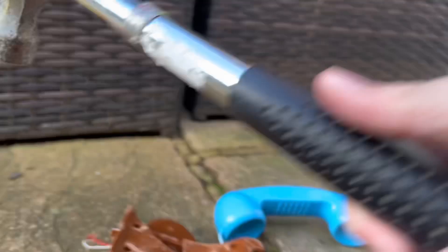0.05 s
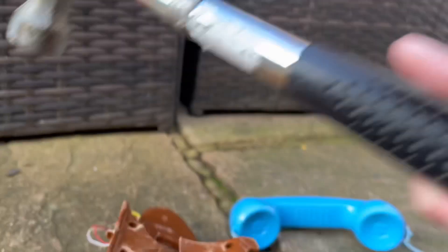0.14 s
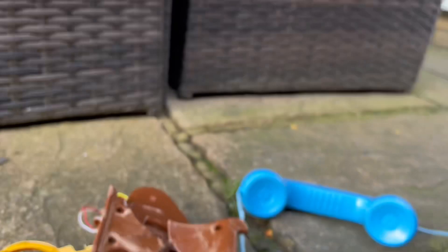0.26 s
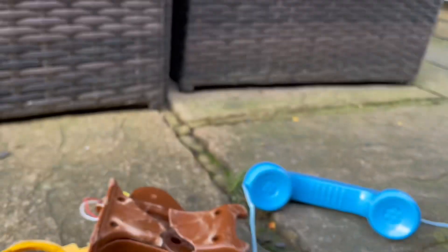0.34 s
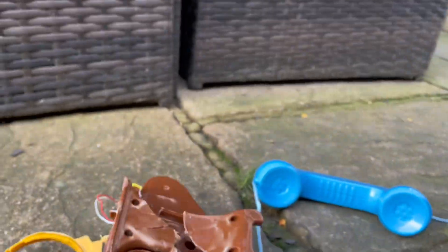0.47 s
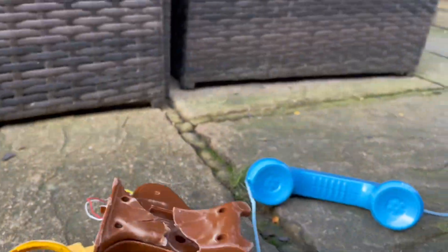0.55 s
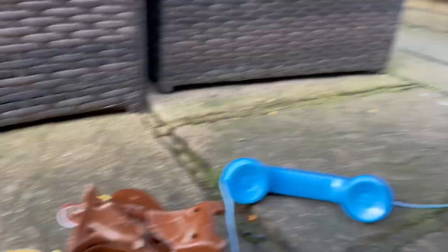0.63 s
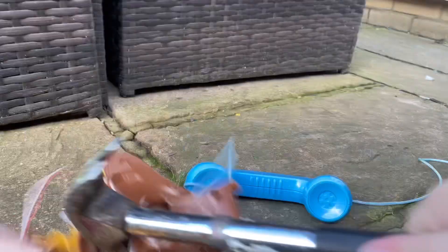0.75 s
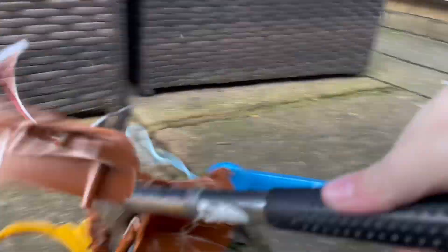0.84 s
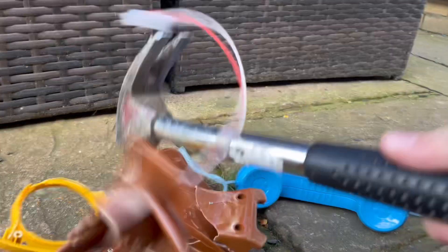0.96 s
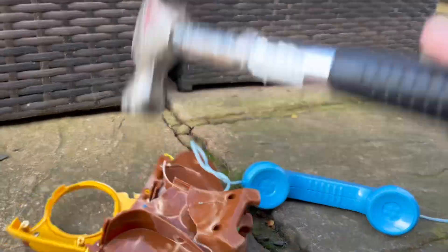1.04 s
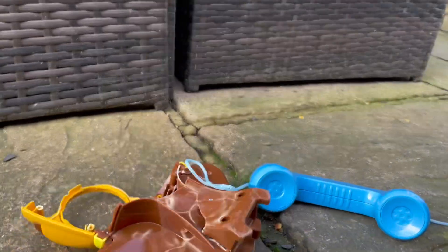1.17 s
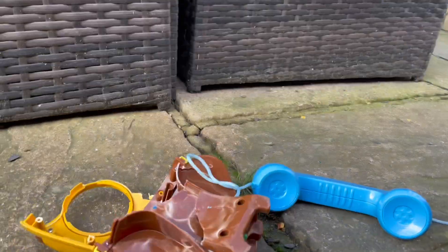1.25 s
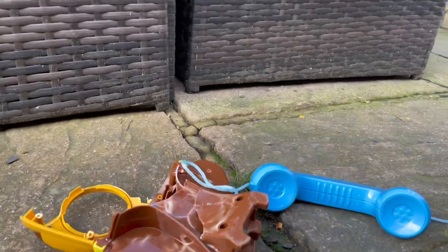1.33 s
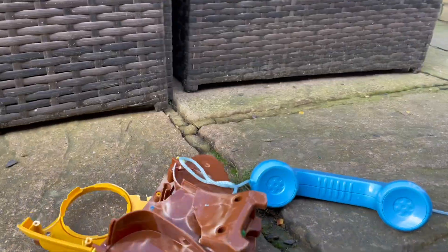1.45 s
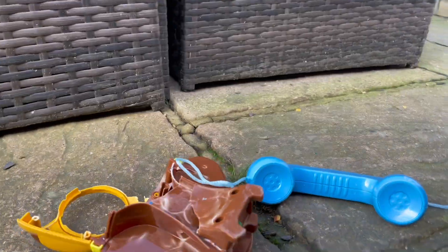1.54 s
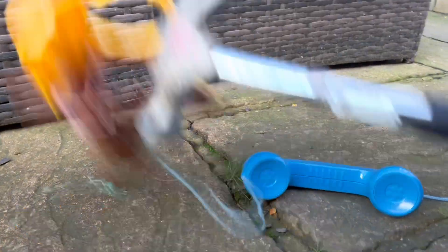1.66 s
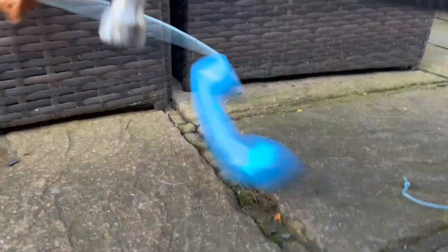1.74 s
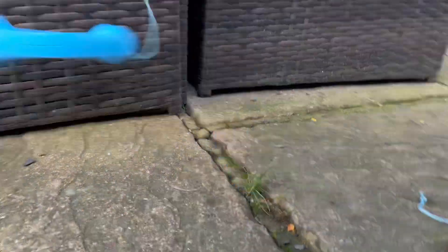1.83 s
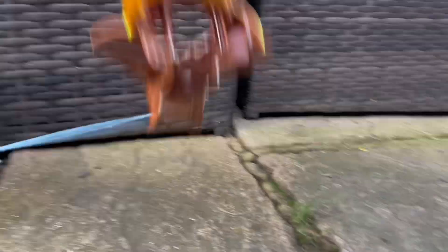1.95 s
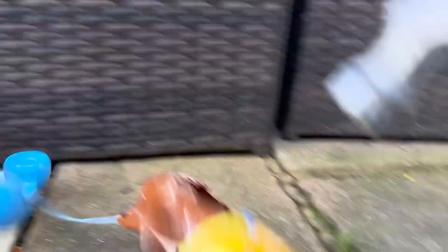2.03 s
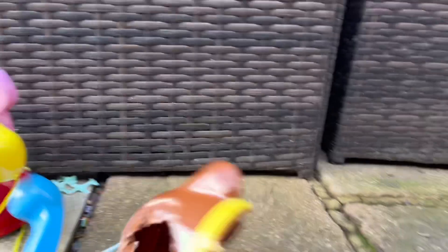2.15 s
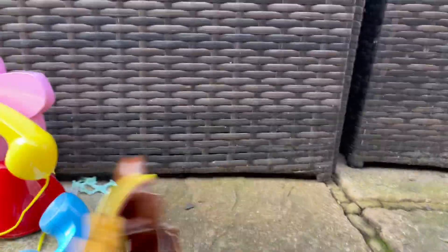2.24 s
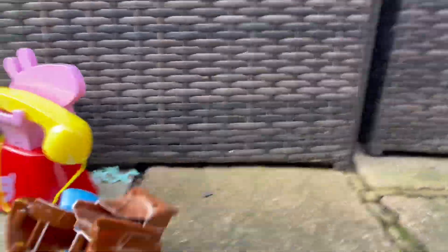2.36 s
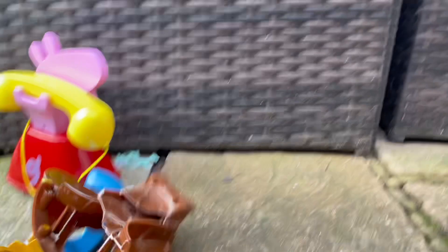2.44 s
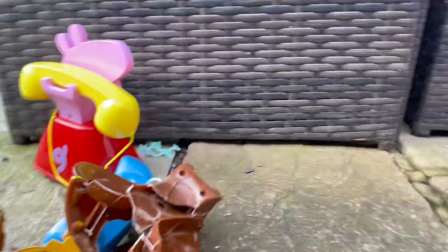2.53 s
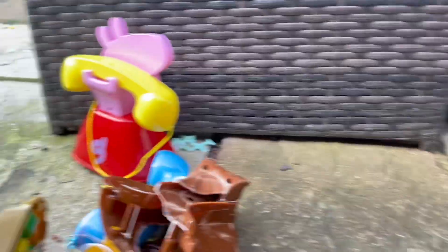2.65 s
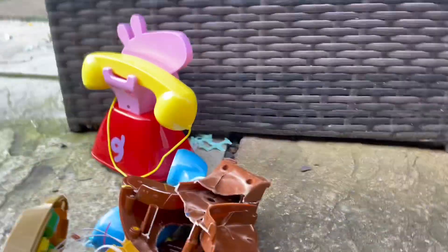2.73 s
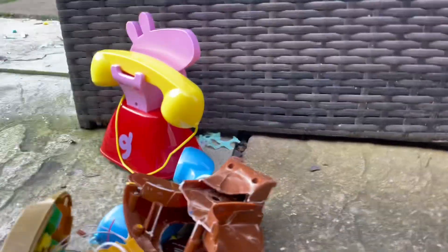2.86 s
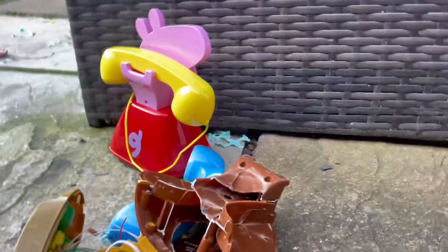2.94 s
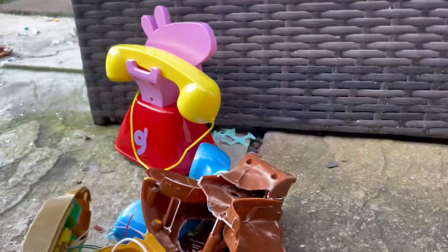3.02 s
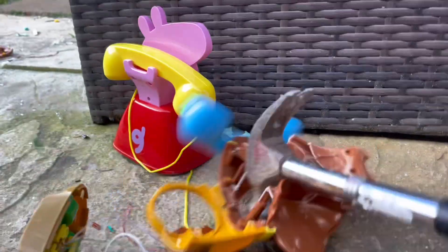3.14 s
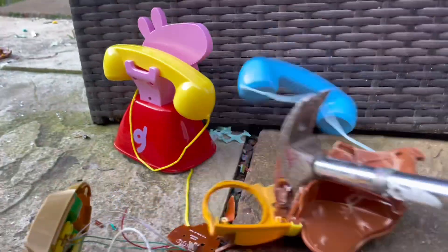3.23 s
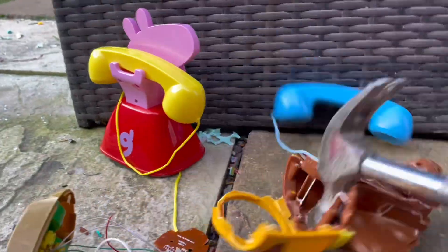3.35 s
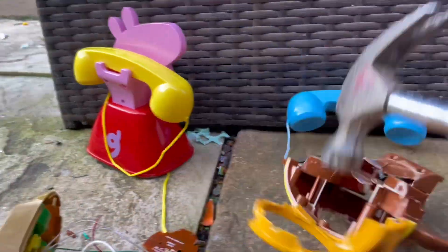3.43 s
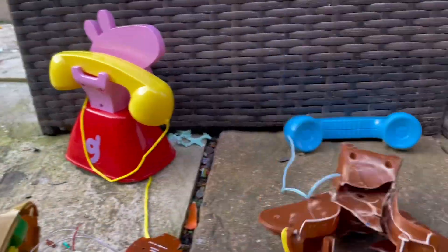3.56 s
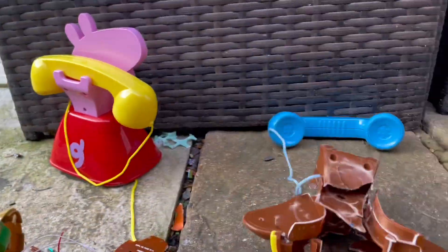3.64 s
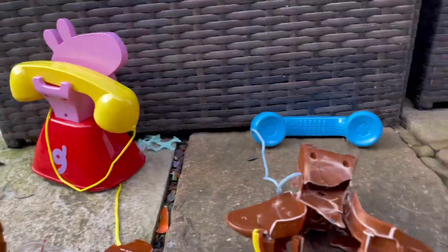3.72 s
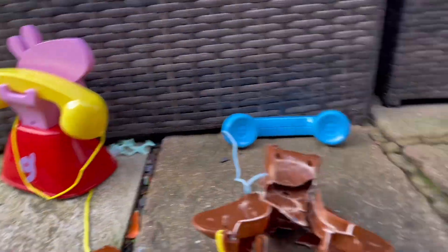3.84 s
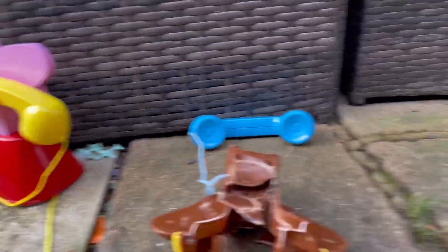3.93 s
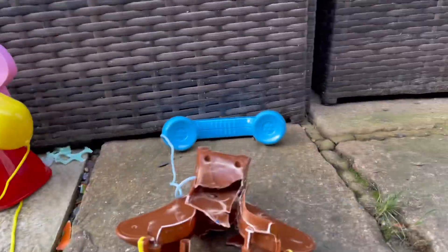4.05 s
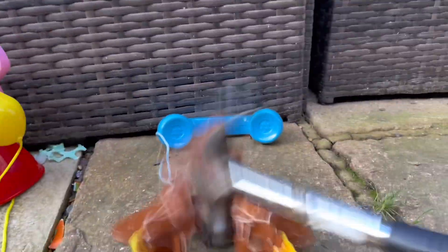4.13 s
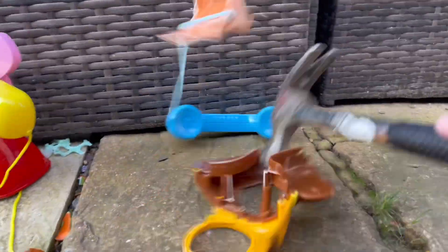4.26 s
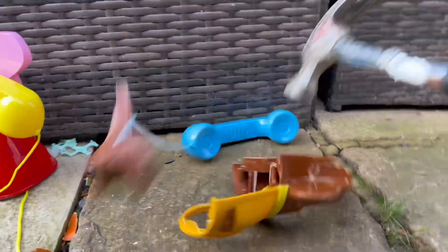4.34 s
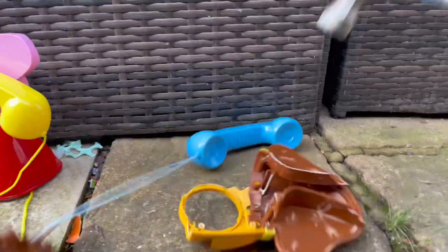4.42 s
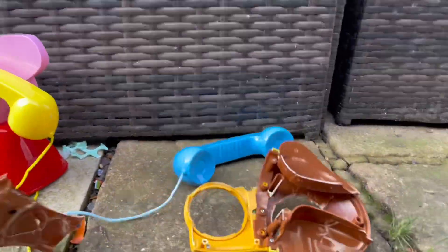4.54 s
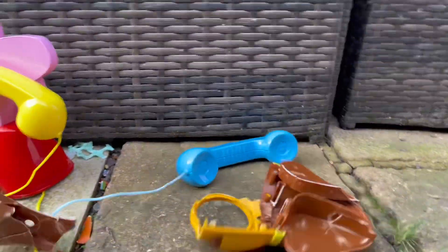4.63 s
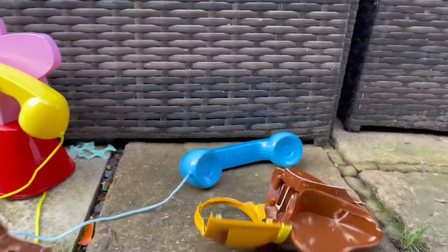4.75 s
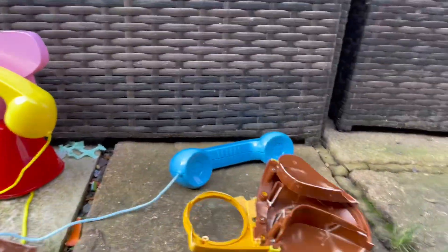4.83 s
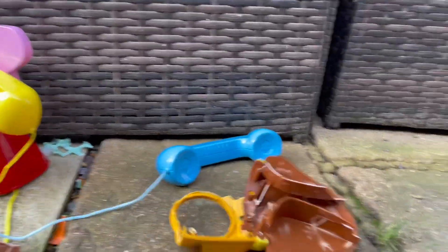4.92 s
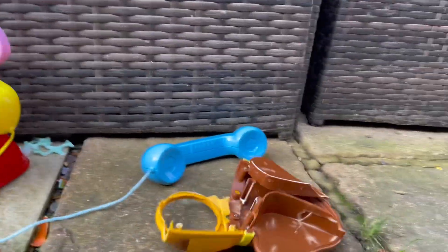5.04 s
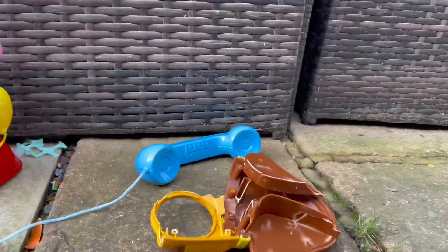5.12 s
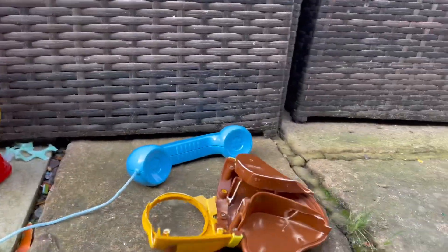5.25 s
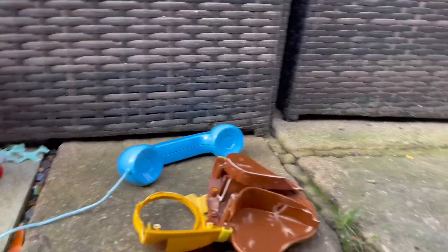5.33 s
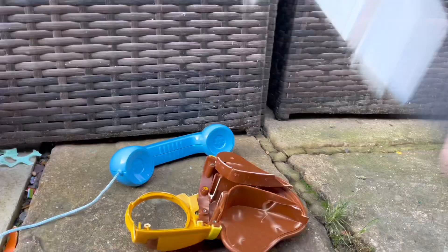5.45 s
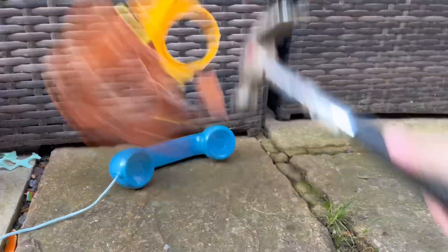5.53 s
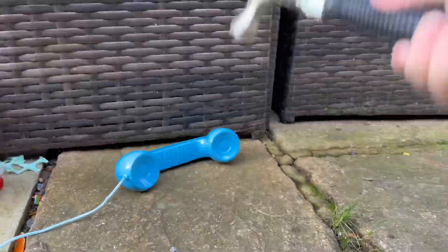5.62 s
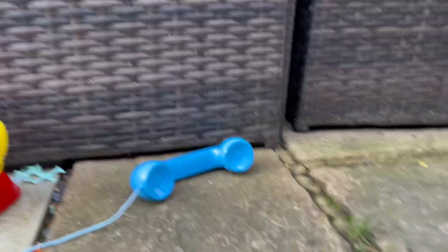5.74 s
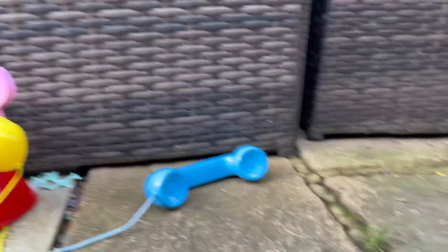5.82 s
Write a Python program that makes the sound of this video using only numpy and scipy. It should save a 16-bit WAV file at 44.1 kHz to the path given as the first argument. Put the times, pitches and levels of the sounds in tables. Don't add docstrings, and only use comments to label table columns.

```python
import sys
import numpy as np
from scipy import signal
from scipy.fft import rfft, irfft, next_fast_len
from scipy.io import wavfile
from scipy.ndimage import uniform_filter1d, map_coordinates

SR = 44100
rng = np.random.default_rng(int(sys.argv[2]) if len(sys.argv) > 2 else 0)


def nominal_scale(level):
    x = np.asarray(level, float) / 20
    return 10 ** x


def inscribe(sig):
    pcm = np.round(np.clip(np.atleast_2d(sig).T, -1, 1) * 32767)
    wavfile.write(sys.argv[1], SR, pcm.astype(np.int16))


N = 259308

# start_s, peak_db, ring_hz
CHIPS = [(.0354, -14, 3123), (1.565, -56, 4970), (1.752, -40, 4060), (1.77, -42, 3020), (1.787, -45, 2940),
         (4.19, -36, 3004), (4.86, -44, 5477), (.1029, -27, 3004), (.2402, -39, 960), (.4655, -55.5, 4960),
         (.5348, -61, 3560), (.555, -51, 4860), (.6067, -54, 1443), (1.0549, -20, 3923),
         (1.1846, -34.5, 5843), (1.2304, -31, 5770), (1.292, -35.5, 2672), (1.918, -46.5, 2980),
         (2.1693, -22.5, 5050), (2.1821, -26.5, 2886), (2.243, -15.5, 621.4), (2.2838, -31.5, 2960),
         (2.4787, -28, 1180), (2.835, -66.5, 3052), (2.865, -60, 3000), (2.915, -63, 2590),
         (2.881, -60, 2500), (2.929, -62, 2640), (2.993, -60, 2635), (3.052, -61.5, 2490),
         (3.88, -58.5, 2407), (3.5197, -24.5, 1218), (3.5876, -27, 1690), (4.4005, -17, 594.8),
         (4.5649, -35, 3514), (4.6015, -42, 3500), (5.6077, -37.5, 949.6)]
# start_s, peak_db, ring_hz
PIECES = [(.0034, -17, 1296), (.0704, -27.5, 1549), (.1182, -28.5, 1171), (.1589, -31.5, 3157),
          (.1842, -23.5, 1154), (.2678, -32.5, 1139), (.3081, -39.5, 1057), (.5024, -57, 1480),
          (.775, -19, 1401), (.811, -25, 1560), (.9419, -26.5, 524), (1.0792, -23, 1198),
          (1.1262, -37.5, 2908), (1.25, -37, 2596), (1.4652, -46.5, 1560), (1.8059, -34, 3089),
          (1.8661, -26.5, 6016), (1.957, -13, 3068), (2.0477, -10.5, 3351), (2.0624, -12, 2563),
          (2.1222, -14.5, 644), (2.3612, -27, 5040), (2.372, -33, 4450), (2.576, -34.5, 4230),
          (2.14, -26, 645), (3.4245, -17, 1378), (3.4389, -18.5, 2012), (3.6024, -15.5, 1427),
          (3.6481, -27, 1125), (3.7738, -52.5, 2330), (4.535, -39.5, 1106), (4.623, -33, 2548),
          (4.8592, -46.5, 2406)]
# start_s, peak_db, ring_hz
HALVES = [(.0854, -33.5, 691), (.3258, -36.5, 1018), (.4388, -63.5, 1358), (.8282, -29, 1276),
          (.9694, -31.5, 1385), (1.3191, -49.5, 2130), (1.5396, -57, 1610), (1.7372, -35.5, 2530),
          (2.0001, -30.5, 656), (2.0993, -18, 1557), (2.1524, -26.5, 729), (2.3034, -32.5, 1026),
          (2.4057, -32.5, 4410), (2.5069, -28.5, 1614), (2.555, -30, 4240), (2.6283, -35, 1484),
          (2.6648, -42.5, 1593), (2.6964, -49, 882), (3.1998, -25, 944), (3.248, -24, 2472),
          (3.3318, -34.5, 1520), (3.3954, -37.5, 1480), (3.6958, -40, 5680), (3.8094, -69, 2385),
          (4.2065, -28.5, 1556), (4.2844, -30, 1583), (4.3615, -32, 550), (4.434, -25.5, 2550),
          (4.661, -39.5, 2450)]
# start_s, peak_db, ring_hz
PINGS = [
    (4.7107, -32.5, 2896),
    (4.7851, -32.5, 2962),
    (4.8942, -59, 2750),
]
# start_s, peak_db, ring_hz
WOBBLE = [(4.8281, -31, 1620), (4.959, -42.5, 1134), (4.9783, -47.5, 552), (4.845, -38, 1997),
          (5.0886, -36.5, 2385), (5.108, -40, 2304), (5.176, -52.5, 1080), (5.19, -49.5, 2290),
          (5.278, -53.5, 1410), (5.292, -47, 2442), (5.3397, -54.5, 1555), (5.4231, -52.5, 834)]
HALF_HZ = [1444, 1661.6, 2090, 2356, 2550]
# pitch_hz, level_db (per Hz)
SHARD = [(150, -45.5), (250, -14), (670, -2), (1900, -6.5), (4800, -5), (7000, -3.5), (8500, -1.5),
         (12000, -7.5), (14500, -7), (16400, -17)]
# time_s, left_db (louder to the left)
PLACE = [(0, 1.27), (.6, 1.77), (1.9, 1.12), (2.5, 3), (3.1, -1), (4.3, 0.59), (5.1, 1), (5.88, 0.26)]
# start_s, peak_db, low_tone_db
ROCKS = [(0.117, -34.5, -19), (0.1889, -34.5, -25.5), (0.247, -44, -22), (0.2698, -30, -22.5),
         (0.3259, -33.5, -10), (0.3958, -52.5, -12), (1.0798, -40.5, -21.5), (2.123, -36, 5),
         (2.2454, -43.5, 1), (2.3022, -41.5, -2), (2.3395, -45, -7), (2.4056, -43.5, -20),
         (2.476, -45, -12), (3.518, -38.5, -13), (3.6534, -46.5, -21), (3.683, -49, -10),
         (3.722, -65, -32.5), (4.5132, -41.5, -10), (4.534, -45.5, -0.5), (4.5671, -41, -16),
         (4.6042, -47, -16.5), (4.632, -42.5, -18)]
# pitch_hz, t60_s (time to fall by 60 dB)
HANDSET = [(645, 0.14), (1098, 0.13)]
# time_s, level_db
SKID = [(0.0, -43), (0.64, -89), (0.95, -49), (1.1, -61.5), (1.42, -81), (2.15, -62.5), (2.5, -49.5),
        (2.72, -77), (3.16, -86.5), (3.31, -55.5), (3.72, -63.5), (3.9, -82.5), (4.17, -83.5), (4.31, -57),
        (4.62, -63), (5.42, -92), (5.6, -63), (5.8, -75.5)]
# pitch_hz, level_db (per Hz)
GRIT = [(150, -49.5), (250, -26), (840, -10), (1070, -5), (1900, -12), (5700, -12), (8500, -15.5),
        (12000, -25.5), (14500, -23), (16400, -37.5)]
# peak_s, level_db, width_s (time to fall by 20 dB)
GUSTS = [(.0, -49, 0.1023), (.2, -60, 0.324), (.44, -61.5, 0.22), (.97, -45.5, 0.29), (1.58, -57.5, 0.1462),
         (1.86, -48.5, 0.2589), (2.35, -67.5, 1.21), (3.05, -66, 0.26), (3.4, -47.5, 0.1931),
         (3.73, -52, 0.12), (3.93, -44.5, 0.1289), (4.071, -45.5, 0.34), (4.41, -40, 0.2272),
         (4.8, -56, -0.52), (5.0, -54.5, 0.1145), (5.1, -57, -0.02), (5.27, -54, -0.08), (5.42, -58, -0.23),
         (5.6, -49.5, -0.18), (5.76, -49.5, 0.8463), (5.86, -48.5, 0.82)]
# pitch_hz, level_db (per Hz)
BUFFET = [(15, -47.5), (30, -9.5), (107, 0.5), (199, -8), (350, -21), (519, -34), (769, -62.5), (1500, -78),
          (1950, -106), (3300, -120)]
# start_s, level_db, direction (+1 or -1)
SNAPS = [(0.9021, -24.5, 1), (0.9432, -22.5, 1), (0.9936, -20, -1), (1.0534, -21.5, 1), (1.1002, -32, -1),
         (1.831, -42.5, -1), (1.8682, -31, 1), (3.3057, -31, 1), (3.4249, -22.5, 1), (3.467, -29, -1),
         (4.333, -25, 1), (4.364, -19.5, 1), (4.3796, -19, -1), (4.4034, -15.5, 1), (4.4277, -13.5, -1),
         (4.4681, -25.5, -1), (4.4792, -19.5, 1), (4.506, -30, -1), (5.7055, -28.5, -1), (5.7571, -12, -1),
         (5.8, -22, 1)]
# suction_s, level_db, shove_earlier_s, shove_db (against suction)
THUDS = [
    (0.7542, -8, .009, -3.5),
    (1.6578, -8, 0.0021, -10),
    (3.141, -13.5, 0.0043, -5.5),
    (4.161, -15, 0.0026, 3),
    (5.526, -14, 0.0035, -14.5),
]
# start_s, level_db, direction (+1 or -1), corner_hz
HEAVES = [(.088, -44.5, 1, 550), (0.119, -42.5, -1, 450), (0.189, -36.5, 1, 550), (0.247, -48, 1, 450),
          (0.269, -39, -1, 550), (0.306, -46, 1, 500), (.327, -45.5, 1, 500), (1.807, -38, -1, 300),
          (1.876, -32, 1, 200), (1.903, -28, -1, 220), (3.716, -33.5, 1, 200), (4.07, -32, -1, 300),
          (.849, -18, -1, 75), (0.867, -15, 1, 75), (0.963, -24, -1, 65), (1.021, -24, 1, 65),
          (1.233, -43, -1, 402), (1.2491, -43, 1, 353), (2.891, -53.5, 1, 300), (3.279, -20, 1, 77.4),
          (4.207, -30, 1, 500), (4.285, -11.5, -1, 65), (4.31, -13.5, 1, 65), (4.49, -28.5, 1, 70),
          (4.55, -37, 1, 402), (4.967, -37, -1, 401), (4.975, -35.5, -1, 377), (4.985, -37.5, 1, 300),
          (4.996, -27, -1, 197), (5.259, -33.5, 1, 197), (5.275, -33, -1, 120)]
# start_s, level_db, lead_in_db, bottom_s (until the head bottoms out), shell_ring_hz
BLOWS = [
    (0.7430, -11, -12.5, 0.0071, 520),
    (1.6559, -13, -16.5, .005, 561.8),
    (3.1350, -10, -7.5, .009, 996.7),
    (4.1493, -11.5, -16.5, 0.016, 945.2),
    (5.5188, -10, -16, .006, 898.5),
]
# after_contact_s, level_db, t60_s
STAGES = [
    [(0, 0, .05), (.004, 0.5, .05), (.010, 0, .05), (.017, -4.5, .07), (.030, -14, .06)],
    [(0, 4, .05), (.005, -1, .06), (.0155, 0, .05), (.022, -9, .07), (.032, -19, .07)],
    [(0, 2.5, .06), (.005, -1, .06), (.010, -3, .06), (.019, -7.5, .07), (.027, -13.5, .08)],
    [(0, 1.5, .05), (.004, 3.5, .05), (.008, 1.5, .05), (.012, -3, .05), (.020, -6.5, .03)],
    [(0, 2, .05), (.003, -1.5, .05), (.007, -9, .06), (.014, -18, .06)],
]
# pitch_hz, level_db (per Hz)
CRUNCH = [(90, -19), (150, -3), (280, -4), (420, -11), (650, -15.5), (1000, -12.5), (1500, -13.5),
          (5500, -17), (7200, -16), (9000, -18.5), (12000, -23), (14500, -26), (16400, -30)]
# pitch_hz, width_hz, level_db
SHELL = [(1400, 400, -5.5), (1650, 30, -16), (3500, 50, -32), (5040, 320, -7.5), (7430, 480, -16),
         (11900, 1100, -4.5)]
# pitch_hz, t60_s
YARD = [(300, 0.033), (2000, 0.11), (10000, 0.25)]
# pitch_hz, lead_radians
LEAD = [(0, 0), (600, 0.7), (1120, 0.9), (2580, 1.1), (4050, -0.5), (4650, 0.6), (5510, 0.2), (6720, -0.7),
        (7840, -3.1), (8870, -3.2), (10300, -6.2), (13000, -6.4), (14000, -9.3), (16100, -9.5)]
# pitch_hz, left_minus_right_db
LEAN = [(60, -0.5), (110, 0.0), (200, -0.5), (380, 0.0), (700, 2.0), (1290, 2.0), (2380, 3.5), (4400, 4.0),
        (8120, 1.0), (15000, 0.0)]
# pitch_hz, level_db (per Hz)
HISS = [(18, -35.5), (30, -6.5), (115, -3.5), (199, -38.5), (311, -28), (404, -58.5), (2830, -39),
        (3490, -48), (16000, -51)]
# pitch_hz, level_db
GATE = [(300, -110), (2000, -100), (7000, -86.5), (8500, -90.5), (10500, -90.5), (15000, -90)]


def unit(x):
    return x / np.sqrt(np.mean(x ** 2) + 1e-20)


def along(points, hz):
    f, v = np.transpose(points)
    return np.interp(np.log(hz + 1), np.log(f + 1), v)


def curve(rows):
    return np.interp(np.arange(N) / SR, *np.transpose(rows))


def filtered(x, response):
    m = next_fast_len(x.shape[-1] + 8192)
    spectrum = rfft(x, m) * response(np.fft.rfftfreq(m, 1 / SR))
    return irfft(spectrum, m)[..., :x.shape[-1]]


def resonance(f, hz, width):
    return 1j * f * width / (hz * hz - f * f + 1j * f * width)


def ring(t, hz, t60):
    return np.sin(2 * np.pi * hz * t) * nominal_scale(-60 * t / t60) * (1 - np.exp(-t / 0.00036))


def crackle(shape, rate, spread_db, share):
    size = nominal_scale(spread_db * np.minimum(rng.exponential(size=shape), 3))
    clicks = (rng.random(shape) < rate / SR) * size * rng.standard_normal(shape)
    return np.sqrt(1 - share) * unit(clicks) + np.sqrt(share) * rng.standard_normal(shape)


def wander(count, every):
    points = rng.standard_normal(count // every + 3)
    return map_coordinates(points, [np.arange(count) / every])


def add(track, x, s):
    i = max(round(s * SR), 0)
    track[:, i:i + x.shape[-1]] += x


def land(track, landings, rattle_s, ring_db, click_db, dull_hz, fixed_hz=None):
    t = np.arange(SR // 5) / SR
    for s, db, ring_hz in landings:
        fade = nominal_scale(-60 * t / rattle_s) * (1 - np.exp(-t / (0.012 * rattle_s)))
        cracks = crackle(t.shape, 2000, spread_db=3, share=.25)
        cracks = cracks + .4 * rng.standard_normal((2, len(t)))
        chance_hz = np.exp(rng.uniform(np.log(900), np.log(7000), size=4))
        modes = np.append(ring_hz, chance_hz if fixed_hz is None else fixed_hz)
        body = lambda f: 1 + 1.7 * sum(resonance(f, hz, 0.057 * hz) for hz in modes)
        dull = lambda f: 1 / np.sqrt(1 + (f / dull_hz) ** 2)
        rattle = filtered(fade * cracks, lambda f: nominal_scale(along(SHARD, f)) * body(f) * dull(f))
        rattle = rattle / np.abs(rattle).max()
        ping = min(ring_hz / 2600, 1) ** 2 * ring(t, ring_hz, .016)
        click = nominal_scale(click_db - 60 * t / 0.0026) * rng.standard_normal(len(t))
        click = filtered(click, lambda f: 1 / (1 + 1j * f / 7000) ** 2)
        sound = rattle + nominal_scale(ring_db) * ping + click
        pan_db = np.interp(s, *np.transpose(PLACE)) + rng.normal(0, .8)
        add(track, nominal_scale(db + 4.5) * sound * nominal_scale([[pan_db], [-pan_db]]), s - .0008)


def debris():
    out = np.zeros((2, N + SR))
    land(out, PIECES, rattle_s=0.078, ring_db=-8, click_db=-1, dull_hz=10000)
    land(out, CHIPS, rattle_s=0.034, ring_db=-11, click_db=-5.5, dull_hz=13000)
    land(out, HALVES, rattle_s=0.15, ring_db=-6, click_db=-5.5, dull_hz=4900)
    land(out, PINGS, rattle_s=0.058, ring_db=3.9, click_db=-9, dull_hz=6000)
    land(out, WOBBLE, rattle_s=0.11, ring_db=-7.5, click_db=-14, dull_hz=2600, fixed_hz=HALF_HZ)
    return out[:, :N]


def skid():
    grains = crackle(N, 1200, spread_db=2.5, share=.4) + .4 * rng.standard_normal((2, N))
    z = signal.stft(grains, nperseg=256)[2]
    patches = uniform_filter1d(rng.standard_normal(z.shape[1:]), size=5, axis=0)
    patches = uniform_filter1d(patches, size=6, axis=1)
    rough = signal.istft(z * nominal_scale(4.5 * unit(patches)), nperseg=256)[1][:, :N]
    return nominal_scale(curve(SKID) + 3.0) * unit(filtered(rough, lambda f: nominal_scale(along(GRIT, f))))


def buffeting():
    eddies = crackle(N, 200, spread_db=2, share=.5) + .3 * rng.standard_normal((2, N))
    now = np.arange(N) / SR
    strength = nominal_scale(-80)
    for s, db, width in GUSTS:
        strength = strength + nominal_scale(db - 20 * np.abs((now - s) / width) ** 1.8)
    strength = strength * nominal_scale(2 * wander(N, 2500))
    buffet = unit(filtered(eddies, lambda f: nominal_scale(along(BUFFET, f))))
    lows = filtered(buffet, lambda f: 1 / (1 + (f / 140) ** 6))
    brightness = np.minimum(strength / nominal_scale(-50), 1.4) ** .8
    return strength * (lows + (buffet - lows) * brightness)


def pressure_step(f, corner_hz, sharp):
    edge = sharp * (corner_hz / 500) ** 3 / (1 + (f / 3800) ** 4)
    rounded = 1 / (1 + (f / corner_hz) ** 3.7)
    leak = 1j * f * f / (f + 30) * 14 / (60 ** 2 + f * f) ** 0.7505
    return leak * (rounded + edge) * (1 + 0.76 * resonance(f, 66, 35))


def air_jumps():
    jumps = [(s, db, way, 500 if s < 5.6 else 530) for s, db, way in SNAPS]
    for s, db, earlier, shove_db in THUDS:
        jumps.append((s - earlier, db + shove_db, 1, 372))
        jumps.append((s, db, -1, 372))
        jumps.append((s + 0.0078, db - 5.5, 1, 283))
    jumps.extend(HEAVES)
    out = np.zeros((2, N + SR))
    kick = np.zeros(SR // 5)
    kick[SR // 10] = 1
    for s, db, direction, corner_hz in jumps:
        twist, sharp = (1.4, .035) if s > 5.6 else (.4, .017)
        turn = np.exp(.5j * twist * np.array([[1], [-1]]))
        jump = filtered(kick, lambda f: pressure_step(f, corner_hz, sharp) * turn)
        add(out, np.sign(direction) * nominal_scale(db + 38) * jump, s - .1)
    return out[:, :N]


def microphone_hiss():
    noise = rng.standard_normal((2, N))
    return nominal_scale(-69.0) * unit(filtered(noise, lambda f: nominal_scale(along(HISS, f))))


def handset():
    out, t = np.zeros((2, N + SR)), np.arange(SR // 5) / SR
    (low_hz, low_t60), (high_hz, high_t60) = HANDSET
    for s, db, low_db in ROCKS:
        chatter = nominal_scale(3 * wander(len(t), 300))
        bend = 1 + .005 * rng.standard_normal(3)
        tones = ring(t, bend[0] * high_hz, high_t60)
        tones = tones + nominal_scale(low_db + 0.5) * ring(t, bend[1] * low_hz, low_t60)
        tones = tones + nominal_scale(-15.5) * ring(t, bend[2] * 1460, 0.065)
        add(out, nominal_scale(db - 3.5) * chatter * tones, s)
    return out[:, :N]


def hammer():
    out, lead = np.zeros((2, N + SR)), .018
    t = np.arange(SR // 4) / SR - lead
    for (s, db, lead_db, bottom_s, ring_hz), stages in zip(BLOWS, STAGES):
        graze = (t < 0) * nominal_scale(lead_db + 30 * t / lead)
        power = 0
        for after, g, t60 in [*stages, (0, -23.5, .16)]:
            power = power + (t >= after) * nominal_scale(2 * g - 120 * np.maximum(t - after, 0) / t60)
        cracks = crackle(t.shape, 5000, spread_db=3, share=.4) + .4 * rng.standard_normal((2, len(t)))
        cracks = nominal_scale(1.2 * wander(len(t), 60)) * cracks
        hollow = lambda f: 1.5 * resonance(f, ring_hz, 110)
        body = lambda f: 1 + hollow(f) + sum(nominal_scale(g) * resonance(f, c, w) for c, w, g in SHELL)
        colour = lambda f: nominal_scale(along(CRUNCH, f)) * body(f)
        dull_graze = filtered(graze * cracks, lambda f: 1 / (1 + (f / 6000) ** 6))
        force = np.sqrt(power) * cracks + dull_graze
        crunch = filtered(force, colour) / np.std(filtered(cracks, colour))
        add(out, nominal_scale(db) * crunch, s - lead)
        add(out, nominal_scale(db + 7.5) * ring(t + lead, ring_hz, 0.013), s + bottom_s)
        add(out, nominal_scale(db - 3) * ring(t + lead, 288, 0.039), s + .003)
    return out[:, :N]


def yard(x):
    hz, t, z = signal.stft(rng.standard_normal((2, SR // 3)), SR, nperseg=256)
    tail = signal.istft(z * nominal_scale(-60 * t / along(YARD, hz)[:, None]), SR, nperseg=256)[1]
    late = np.pad(x, ((0, 0), (250, 0)))
    return signal.fftconvolve(late, tail / np.linalg.norm(tail[0]), axes=1)[:, :N]


def scene():
    hits = debris() + handset() + hammer()
    echo = nominal_scale(-11) * filtered(yard(hits), lambda f: 1 / (1 + (f / 5000) ** 4))
    air = hits + echo + skid()
    side = np.array([[.5], [-.5]])
    path = lambda f: nominal_scale(side * along(LEAN, f)) * np.exp(1j * side * along(LEAD, f))
    return filtered(air, path) + buffeting() + air_jumps() + microphone_hiss()


def top_cut(x):
    return signal.sosfilt(signal.butter(12, 16520, fs=SR, output="sos"), x)


def record(dry):
    turns = 1.3
    delay = lambda f: np.exp(-2j * np.pi * turns * np.log((f + 10) / (f + 1200)))
    smeared = filtered(dry, lambda f: delay(f) * (f < 16500))
    hz, _, z = signal.stft(smeared, SR, nperseg=512)
    power = uniform_filter1d(np.abs(z) ** 2, size=7, axis=1)
    power = uniform_filter1d(power, size=3, axis=2).mean(0)
    keep = power / (power + nominal_scale(2 * along(GATE, hz))[:, None])
    pair = np.array([z[0] + z[1], z[0] - z[1]]) / 2
    level = uniform_filter1d(np.abs(pair) ** 2, size=9, axis=1)
    level = uniform_filter1d(level, size=5, axis=2)
    pair = pair * ((level > .17 * level[::-1]) | (level > nominal_scale(-114)) | (hz < 6000)[:, None])
    ports = np.array([pair[0] + pair[1], pair[0] - pair[1]])
    x = signal.istft(ports * keep, SR, nperseg=512)[1][:, :N]
    x = x / (1 + np.abs(x / 0.95) ** 6) ** (1 / 6)
    return top_cut(x)


dry = scene()
out = record(dry)
inscribe(out)
```